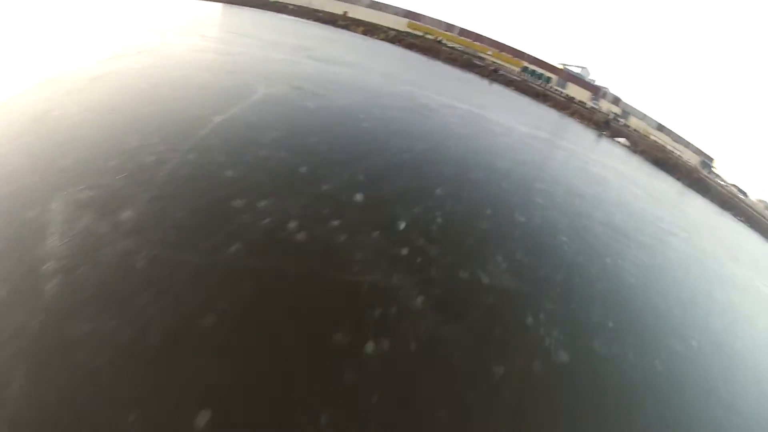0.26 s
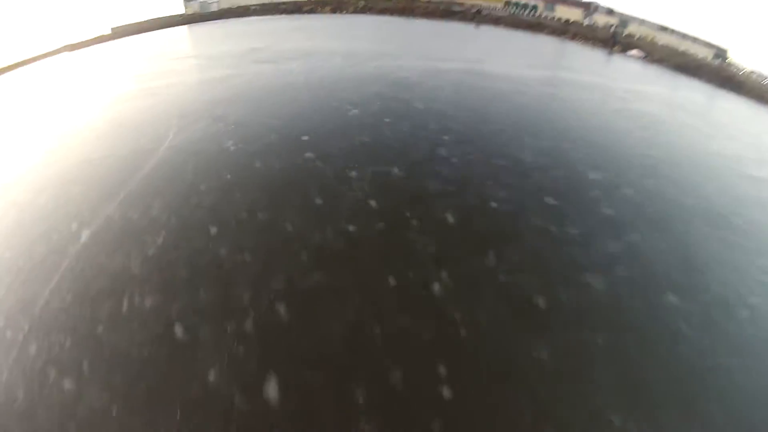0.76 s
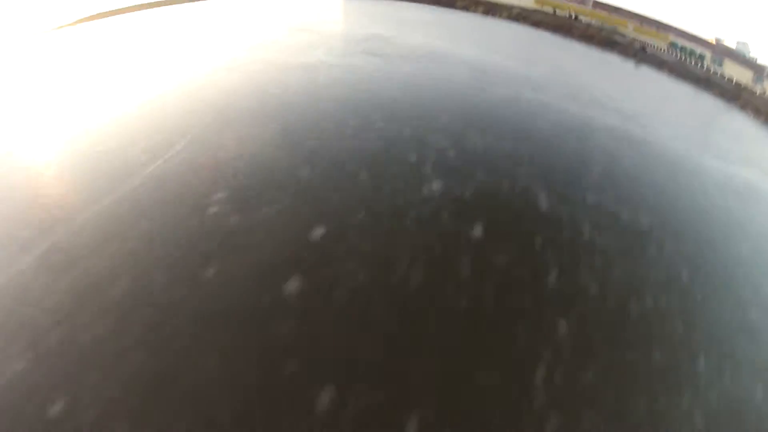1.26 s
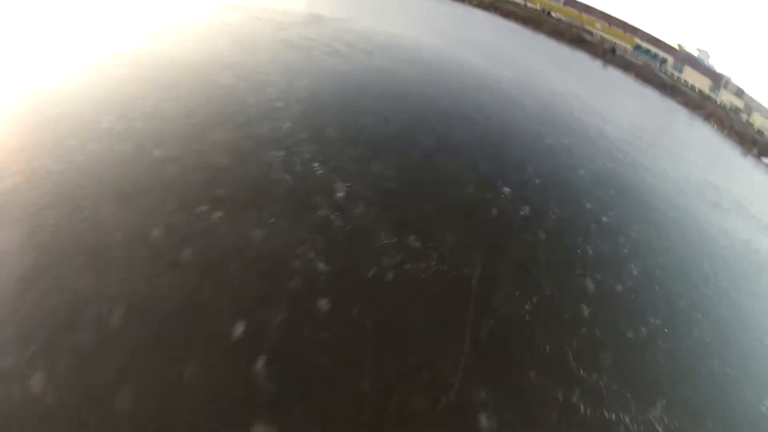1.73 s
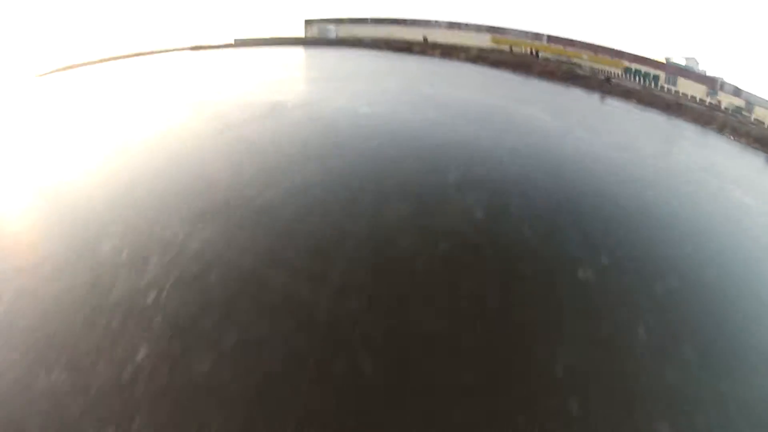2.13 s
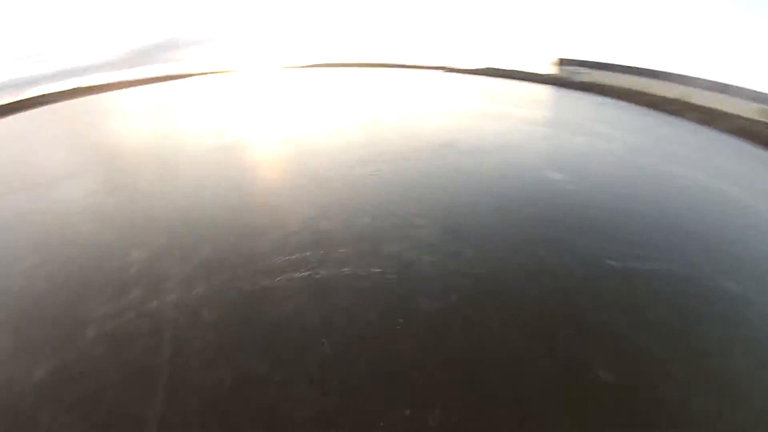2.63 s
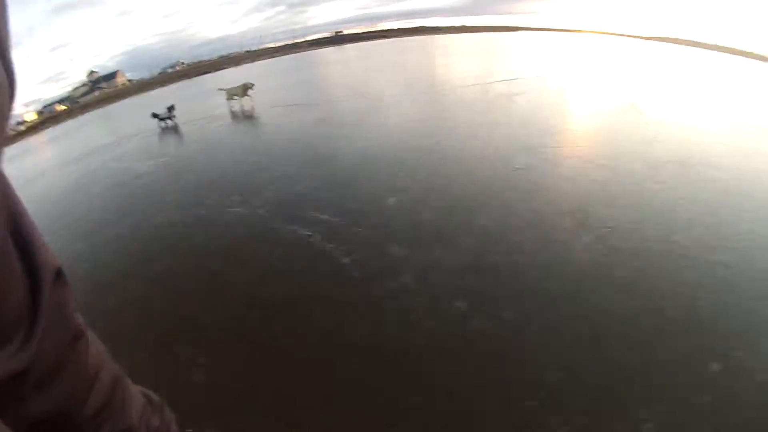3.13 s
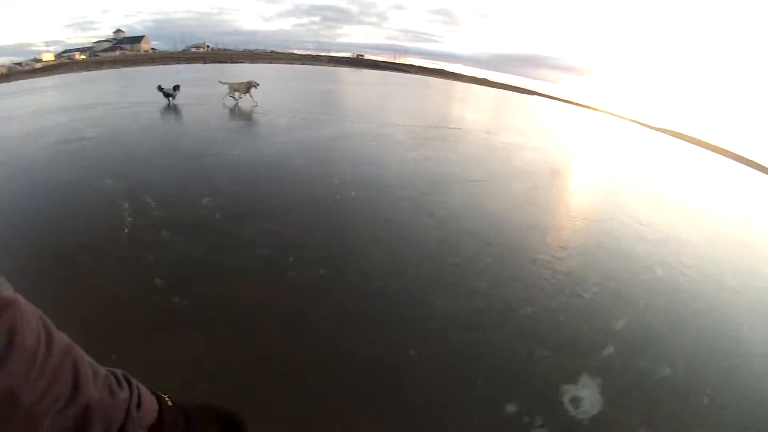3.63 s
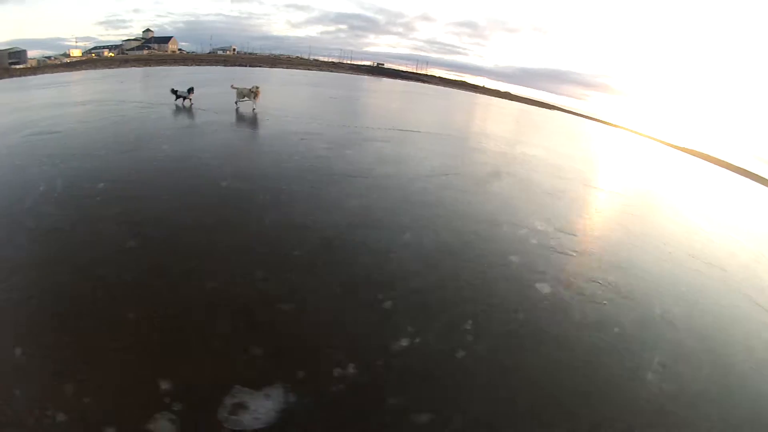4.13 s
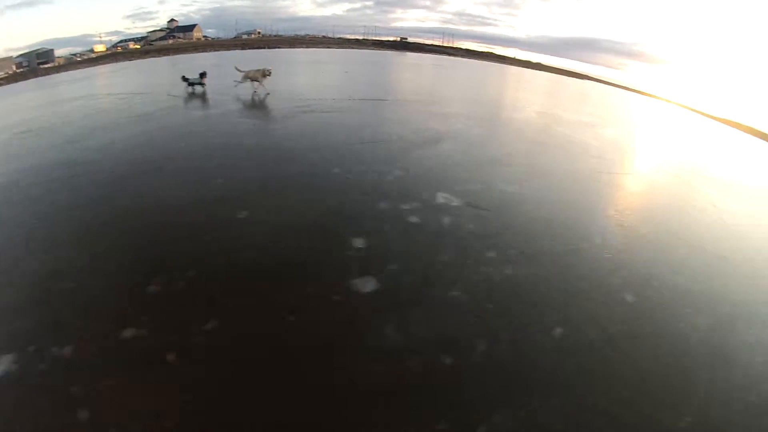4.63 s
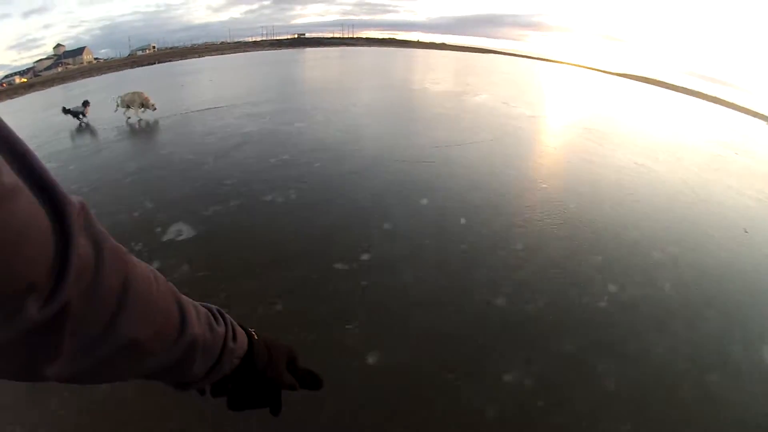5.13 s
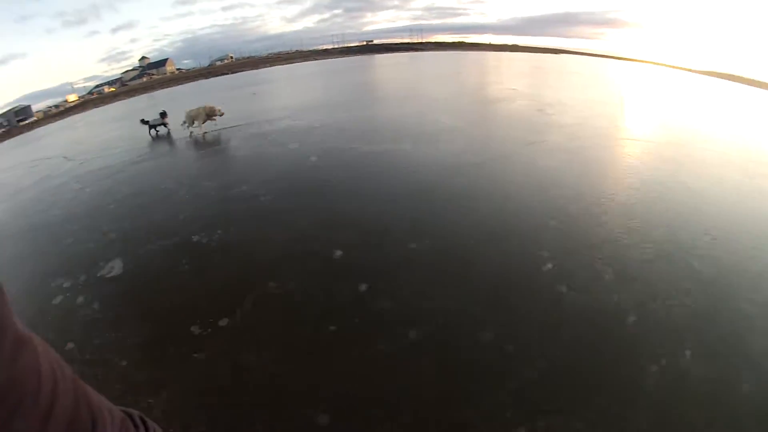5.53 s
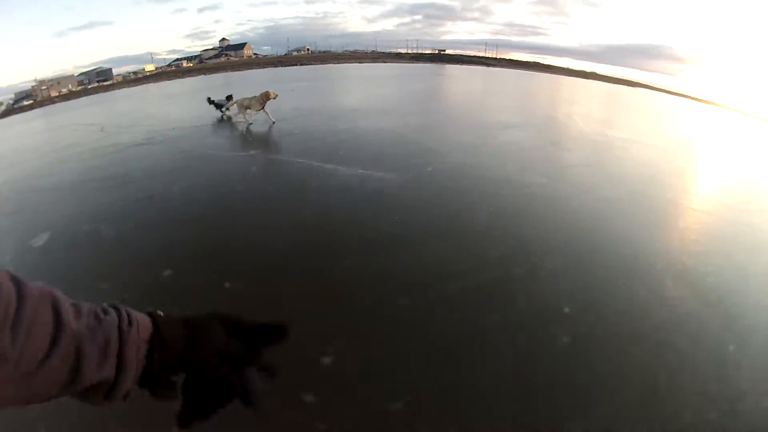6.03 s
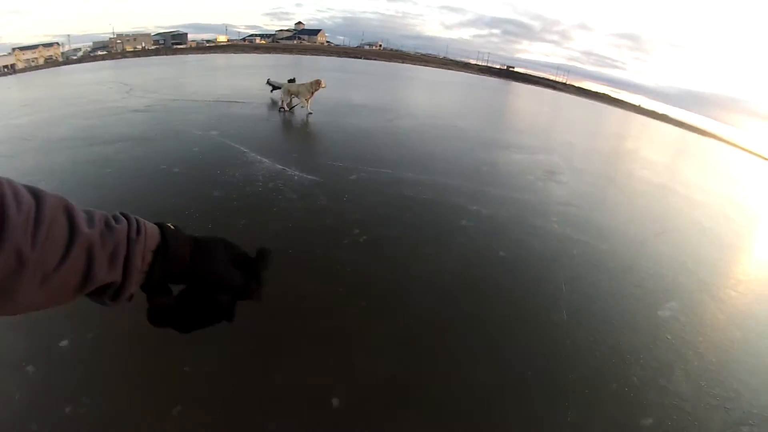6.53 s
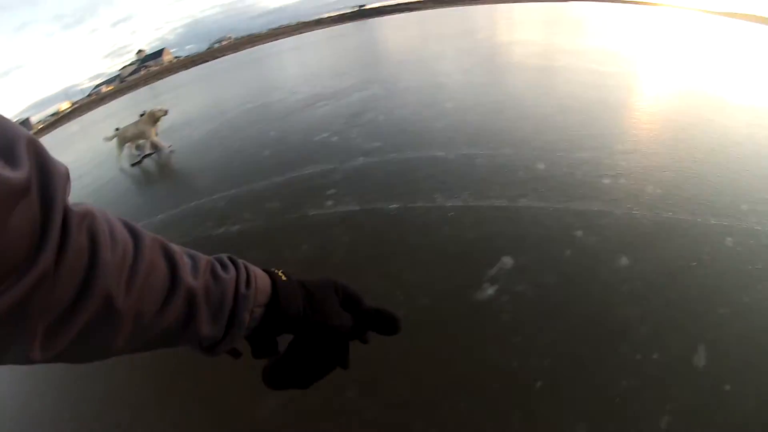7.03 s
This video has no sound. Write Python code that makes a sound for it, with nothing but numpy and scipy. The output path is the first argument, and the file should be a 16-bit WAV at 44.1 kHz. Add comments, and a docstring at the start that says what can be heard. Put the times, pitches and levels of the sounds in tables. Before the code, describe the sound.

Skating on open lake ice, heard from a camera in a sealed plastic housing that gives everything a hollow, nasal ring. From 0 s, short gritty blade hisses swell and fade, with a dull knock at 0.2 s, light ticks over the ice, low wind rumble and faint steady microphone hiss. Strokes are brighter around 1.2-1.3 s, and several ticks cluster near 2 s. At 2.2 s a hand seizes the housing with a heavy thump, then rubs and drags over it; a tiny stuttering rasp comes at 2.5 s, another thump at 2.6 s, then small clicks. The loudest double knock strikes at 3.0 s, and a last bump and bright rub end by 3.35 s. Calmer gliding follows, with scrapes at 3.8, 4.6 and 5.1-5.5 s, ticks around 5.7 s, gusts and a broader scrape near 6.5 s, and clacks and a long scrape around 7 s.

```python
"""On lake ice, a skater glides with a camera in a closed plastic housing, ringing near 1.5 and 2.2 kHz.
The blades hiss in slow strokes (gritty, coloured noise) and tick over flaws in the ice (struck modes).
Air rumbles and flutters past as low noise with gusts, over a steady faint microphone hiss. After an
early knock, the camera is turned round partway through: the hand rubs (noise under pressure), knocks,
rasps (stick-slip) and makes the housing click on its mount."""
import sys
import numpy as np
from scipy import signal
from scipy.fft import rfft, irfft
from scipy.io import wavfile
from scipy.ndimage import uniform_filter1d

SR = 44100
rng = np.random.default_rng(int(sys.argv[2]) if len(sys.argv) > 2 else 0)


def persist_wave(psi):
    """Save psi, clipped to +-1, as 16-bit WAV."""
    counts = np.round(np.clip(psi, -1, 1) * 32767).astype(np.int16)
    wavfile.write(sys.argv[1], SR, np.atleast_2d(counts).T)


N = 321048
TIME = np.arange(N) / SR


def amp(db):
    """Decibels to gain."""
    return 10 ** (np.asarray(db) / 20)


def unit(x):
    """Scales to rms 1."""
    return x / np.sqrt(np.mean(x ** 2) + 1e-20)


def shape(points, hz):
    """Gain of a (f/Hz, level/dB) curve, interpolated over log frequency."""
    f, db = np.transpose(points)
    return amp(np.interp(np.log(hz + 1), np.log(f + 1), db))


def coloured(x, points):
    """Filters x with a spectral curve, then scales it to rms 1."""
    gain = shape(points, np.fft.rfftfreq(len(x), 1 / SR))
    return unit(irfft(rfft(x) * gain, len(x)))


def wander(hz):
    """Random movement of rms 1: noise that rolls off steeply around the given rate."""
    f = np.fft.rfftfreq(N, 1 / SR)
    spectrum = rfft(rng.standard_normal(N)) / (1 + (f / hz) ** 4)
    return unit(irfft(spectrum, N))


def add(mix, s, sound):
    """Mixes a sound in at a time in seconds."""
    part = mix[max(round(s * SR), 0):][:len(sound)]
    part += sound[:len(part)]


def swells(rows, axis, rest_db):
    """Gain over time: each row (t/s, swell/s, fade/s, level/dB, ..) is a bell over a resting level."""
    control_time = TIME[::32]
    power = amp(rest_db) ** 2
    for row in rows:
        peak_s, swell_s, fade_s = row[:3]
        late = control_time - peak_s
        bell = np.exp(-2 * (late / np.where(late < 0, swell_s, fade_s)) ** 2)
        power = power + amp(row[axis]) ** 2 * bell
    return np.interp(TIME, control_time, np.sqrt(power))


def grit(per_s, spread_db, share):
    """Friction: separate micro-fractures of uneven size over a dense wash; share is the grains' power."""
    size = amp(spread_db * np.minimum(rng.exponential(1, N), 4))
    grains = size * rng.choice([-1, 1], N) * (rng.random(N) < per_s / SR)
    share = np.clip(share, 0, 1)
    return np.sqrt(share) * unit(grains) + np.sqrt(1 - share) * rng.standard_normal(N)


# friction makes the cavity sing in a narrow band; drift is a share of its pitch
SING_HZ, SING_WIDTH_HZ, SING_DRIFT = 1445, 110, .04
# the same for the rim, under a biting edge
BITE_HZ, BITE_WIDTH_HZ, BITE_DRIFT = 2266, 200, .05


def sing(hz, width_hz, drift, drift_rate=6):
    """A narrow band of noise at rms 1 whose centre drifts by a share of its pitch."""
    pitch = hz * (1 + drift * wander(hz=drift_rate))
    phase = 2 * np.pi * np.cumsum(pitch) / SR
    in_phase = wander(hz=width_hz / 2) * np.cos(phase)
    quadrature = wander(hz=width_hz / 2) * np.sin(phase)
    return unit(in_phase + quadrature)


def causal(gain):
    """The minimum-phase impulse response: it has this gain and starts at once."""
    log_gain = np.log(np.maximum(gain, 1e-5))
    circle = np.r_[log_gain, log_gain[-2:0:-1]]
    return np.fft.ifft(np.exp(np.conj(signal.hilbert(circle)))).real


def mode(f, hz, width):
    """A steep-sided resonance of peak gain 1: the valleys between modes stay dark."""
    detune = (f * f - hz * hz) / (f * width * np.pi / 2)
    return 1 / (1 + detune ** 2 / 2) ** 2


# the housing's modes, in order frame, walls, lid, air cavity: (f/Hz, width/Hz, relative level/dB)
HOUSING_MODES = [(304, 37, -4), (480, 320, -1), (677, 164, -0.5), (1438, 250, 2)]
# colour of the contact snap: (f/Hz, relative level/dB)
SNAP_SPECTRUM = [(300, -45.5), (1500, -26.5), (2950, 5), (3600, 2.5), (4300, -1), (5400, 0), (6800, -6.5),
                 (7900, -8.5), (9000, -25), (10800, -9.5), (12500, -19), (14000, -24), (16500, -38)]
RIM_WIDTH_HZ, RIM_DB = 455, -2  # the rim's pitch depends on where it is struck
BEND_DELAY_S = .0006  # travel time of a 1 kHz bending wave through the shell; lower ones come later
FADE_OUT_S = 0.043  # fade-out time of each blow's computed response, so the filter does not wrap round


def blow(row, thump_q, soft_hz, snap_s=0.00084, size=4096):
    """One blow: the housing heaves as a whole, its walls, air cavity and rim ring, the contact snaps."""
    ring_db, tilt_db, wall_db, lid_db, cavity_db, rim_hz, thump_db, thump_hz, snap_db = row
    f = np.fft.rfftfreq(size, 1 / SR) + 1
    t = np.arange(size) / SR

    # the heave is a low resonance, softened above and thinned below 35 Hz
    r = f / thump_hz
    thump = amp(thump_db) * r / np.hypot(1 - r * r, r / thump_q)
    thump = thump / (1 + (f / soft_hz) ** 2) * f / np.hypot(f, 35)

    modes = np.array(HOUSING_MODES + [(rim_hz, RIM_WIDTH_HZ, RIM_DB)])
    place_db = np.array([wall_db, wall_db, lid_db, cavity_db, 0])  # the frame shares the wall boost
    strike_db = ring_db + tilt_db * np.log2(modes[:, 0] / 1000) + place_db
    contact = 1 / np.hypot(1, (f / 3800) ** 3)  # the contact lasts too long to drive the modes far up
    rings = [amp(db + drive_db) * mode(f, hz, width) * contact
             for (hz, width, db), drive_db in zip(modes, strike_db)]

    # the ring travels through the shell and is faded out before its buffer ends
    impulse = causal(np.linalg.norm([thump] + rings, axis=0))
    bending = np.exp(-4j * np.pi * BEND_DELAY_S * np.sqrt(1000 * f))
    fade_out = np.exp(-(t / FADE_OUT_S) ** 4)
    body = irfft(rfft(impulse) * bending) * fade_out

    crunch = rng.standard_normal(size) * t * np.exp(-t / snap_s)  # the surfaces graze for an instant
    crunch = crunch / np.linalg.norm(crunch)
    snap = signal.fftconvolve(crunch, causal(shape(SNAP_SPECTRUM, f)))[:size]
    return body + amp(snap_db) * snap


def blows(rows, thump_q, soft_hz, tail_db, tail_s, size=4096):
    """A table of blows, each with a brief noisy rattle that starts with the hit, thinned below 300 Hz."""
    out = np.zeros(N)
    t = np.arange(size) / SR
    above_thump = signal.butter(2, 300, "high", fs=SR)
    for s, *row in rows:
        hit = blow(row, thump_q, soft_hz)
        rattle = rng.standard_normal(size) * np.exp(-t / tail_s)
        rattle = signal.lfilter(*above_thump, rattle / np.linalg.norm(rattle))
        start = s - BEND_DELAY_S
        add(out, start, hit)
        add(out, start, amp(tail_db) * signal.fftconvolve(hit, rattle))
    return out


# colours of the dull scrape, bright edge and fine ice spray: (f/Hz, relative level/dB)
SCRAPE_SPECTRUM = [(250, -17), (450, -12), (580, -16), (700, -4.5), (830, -5.5), (960, -14), (1170, -7.5),
                   (1330, -1), (1500, 2), (1620, -5.5), (1760, -22), (2100, -47.5)]
EDGE_SPECTRUM = [(600, -15.5), (1200, -15), (1750, -7.5), (1950, -1.5), (2130, 4), (2400, -2), (2650, -5),
                 (3000, -9.5), (3400, -26), (3800, -11.5), (4500, -46)]
SPRAY_SPECTRUM = [(2500, -25), (3300, -9.5), (3850, 3), (4400, 1), (5100, 5), (6000, -2.5), (7000, 0.5),
                  (7800, -2.5), (8800, -14.5), (10200, -17), (11300, -3), (12500, -14), (13200, -46)]
# a crumb of ice under a blade, one blow before levelling: (ring level/dB, tilt/dB per octave,
# wall boost/dB, lid boost/dB, cavity boost/dB, rim f/Hz, thump level/dB, thump f/Hz, snap level/dB)
ICE_CRUMB = (-1.5, 0.5, -0.5, 2.5, -2.5, 2195.5, -16.5, 128.5, -18)
# strokes of the blades, t at full weight, relative levels:
# (t/s, swell/s, fade/s, scrape level/dB, edge level/dB, spray level/dB)
BLADE_STROKES = [(0.0, 0.037, 0.084, -69, -68, -78.5), (0.24, 0.038, 0.12, -77, -72.5, -81.5),
                 (0.6, .05, 0.033, -69.5, -72, -83.5), (0.76, 0.16, 0.1, -80, -74.5, -83),
                 (1.19, 0.079, 0.095, -73.5, -69, -78), (1.31, 0.056, 0.087, -69, -67.5, -78.5),
                 (1.82, .2, 0.28, -73.5, -83, -87), (2.18, 0.11, 0.087, -75.5, -73, -82),
                 (3.42, 0.065, 0.22, -76, -80, -90.5), (3.8, 0.028, 0.02, -64, -72, -100),
                 (4.0, 0.35, .22, -77.5, -80.5, -89), (4.59, 0.084, 0.072, -66.5, -65.5, -84.5),
                 (4.86, 0.11, .06, -84.5, -77, -86.5), (5.14, 0.093, 0.11, -64.5, -75.5, -84),
                 (5.33, 0.04, 0.046, -65.5, -78, -82), (5.5, 0.16, 0.27, -72, -78, -84),
                 (6.55, .11, 0.14, -67.5, -69, -86.5), (7.14, 0.17, 0.21, -68.5, -78, -81)]
COAST_DB, COAST_EDGE_DB, COAST_SPRAY_DB = -79.5, -82, -91  # the blades running free between strokes


def blades():
    """Steel shaves the ice: gritty friction that chatters over the uneven surface, sings, crushes crumbs."""
    chatter = wander(hz=46)
    friction = grit(per_s=420, spread_db=4.0, share=0.16)
    weight = swells(BLADE_STROKES, axis=3, rest_db=COAST_DB)
    edge_weight = swells(BLADE_STROKES, axis=4, rest_db=COAST_EDGE_DB)
    spray_weight = swells(BLADE_STROKES, axis=5, rest_db=COAST_SPRAY_DB)

    scrape = amp(-2.95) * coloured(friction, SCRAPE_SPECTRUM)
    scrape = scrape + amp(-9.5) * sing(SING_HZ, SING_WIDTH_HZ, SING_DRIFT)
    scrape = scrape * amp(2.1 * chatter) * weight

    edge = amp(-0.37) * coloured(friction, EDGE_SPECTRUM)
    edge = edge + amp(-8.5) * sing(BITE_HZ, BITE_WIDTH_HZ, BITE_DRIFT)
    edge = edge * amp(2.0 * chatter) * edge_weight

    spray = coloured(grit(per_s=1500, spread_db=7.5, share=0.17), SPRAY_SPECTRUM)
    spray = unit(spray * amp(0.83 * chatter)) * spray_weight

    crumb_hits = grit(per_s=90, spread_db=4.0, share=1)
    crumbs = signal.oaconvolve(crumb_hits, blow(ICE_CRUMB, thump_q=1.7, soft_hz=357))[:N]
    return scrape + edge + spray + amp(-5.5) * unit(crumbs) * weight


# air moving by the housing, calmer once the camera faces sideways, relative levels:
# (t/s, rumble level/dB, flutter level/dB)
SLOW_BREEZE = [(0.0, -61.5, -65), (0.5, -65, -67.5), (1.802, -67, -74), (2.15, -63.5, -69),
               (3.302, -68, -79.5), (3.6, -63.5, -79.5), (4.352, -70, -85.5), (4.8, -63, -70),
               (5.05, -69, -80.5), (5.75, -66.5, -69.5), (5.95, -64.5, -82), (6.301, -67, -82),
               (7.269, -66.5, -73.5)]
# gusts as the body swings, relative levels: (t/s, half length/s, rumble level/dB, flutter level/dB)
BODY_GUSTS = [(0.0, 0.022, -55, -65), (0.97, 0.064, -59.5, -82), (1.327, 0.15, -59, -60.5),
              (1.59, 0.05, -57.5, -64.5), (3.85, 0.086, -66.5, -79), (4.164, 0.025, -56, -87),
                       (4.524, .05, -60.5, -72), (5.161, 0.032, -56, -82), (5.45, 0.084, -65, -81),
              (6.44, 0.044, -60.5, -77), (6.621, 0.034, -54, -63.5), (6.76, 0.043, -59, -72),
              (7.116, .06, -58, -69)]


def airflow(axis):
    """Gain over time of the slow breeze with its gusts on top; axis 1 is rumble, 2 is flutter."""
    breeze = np.transpose(SLOW_BREEZE)
    bells = [(s, half, half, *db) for s, half, *db in BODY_GUSTS]
    gusts = swells(bells, axis=axis + 2, rest_db=-np.inf)
    return np.hypot(amp(np.interp(TIME, breeze[0], breeze[axis])), gusts)


# colours of the low buffeting, lighter flutter and microphone hiss: (f/Hz, relative level/dB)
RUMBLE_SPECTRUM = [(10, 4.5), (25, 0), (40, -0.5), (60, -7), (100, -14.5), (135, -26), (200, -32.5),
                   (400, -66)]
FLUTTER_SPECTRUM = [(80, -16.5), (140, 8), (200, -3.5), (270, -10), (400, -18), (700, -50.5)]
HISS_SPECTRUM = [(100, 3), (400, 15.5), (1000, 8.5), (3000, 2), (8000, -2), (12400, -2.5), (13200, -37.5)]


def air():
    """Moving air as coloured noise: lumpy low buffeting and a lighter flutter;
    beneath it the microphone's steady faint hiss."""
    rumble = coloured(rng.standard_normal(N), RUMBLE_SPECTRUM)
    rumble = unit(rumble * amp(2 * wander(hz=13)))
    lumps = amp(2.5 * wander(hz=25))
    flutter = unit(coloured(rng.standard_normal(N), FLUTTER_SPECTRUM) * lumps)
    hiss = coloured(rng.standard_normal(N), HISS_SPECTRUM)
    moving = amp(4.0) * rumble * airflow(axis=1) + amp(-2.0) * flutter * airflow(axis=2)
    return moving + amp(-82) * hiss


# knocks and soft bumps of the hand; the boosts depend on where it lands, levels are relative:
# (t/s, ring level/dB, tilt/dB per octave, wall boost/dB, lid boost/dB, cavity boost/dB,
# rim f/Hz, thump level/dB, thump f/Hz, snap level/dB)
HAND_KNOCKS = [(0.2018, -9, 0, -4, 11.5, -13, 2200, 7.5, 130, -36),
               (2.2207, -0.5, 10, 9.5, 0, 2.5, 1810, 24, 61.4, -14),
               (2.2634, -3, 3, 0, 1, 3.5, 2390, 17, 112, -22.5),
               (2.3133, -24.5, -5, -3, 0, 12, 1976, -5, 123, -50),
               (2.5573, -22, -2, -9, 6, -6, 2150, 1, 200, -38.5),
               (2.5847, -1, -2, 2.5, 2.5, -2, 1810, 24, 64, -37),
               (2.6023, -20, -1, 0, 5, -5, 2070, 5, 55, -33),
               (2.8919, -32, 4, 0, 2, 9, 2100, 16, 63.8, -60),
               (2.9791, -7.5, -5.5, -4, 4.5, -6, 1852, -12, 78.4, -41),
               (2.9874, 9.5, 0, 2.5, 1.5, 6, 2100, 28.5, 130, -10.5),
               (3.0090, 11.5, 8, 6.5, 0, -16.5, 1770, 22, 120, -25),
               (3.2661, -1, -0.5, -22, 1.5, 1.5, 1800, 19.5, 105, -40),
               (3.3085, -24, 9, 2, 2, -4, 1899, 7, 125, -58)]


def knocks():
    """The hand strikes the housing, so its body thumps, its modes ring and its shell rattles."""
    return blows(HAND_KNOCKS, thump_q=1.5, soft_hz=315, tail_db=-10.0, tail_s=0.0056)


# blades clacking over flaws in the ice, heard through the housing, relative levels:
# (t/s, ring level/dB, tilt/dB per octave, cavity boost/dB, thud level/dB)
BLADE_TICKS = [(0.4339, -24, -3, -8, -45), (0.651, -21, -5, -8, 0), (0.8507, -18, 2.5, -9, -9),
               (1.0085, -22.5, 4.5, 1, -42), (1.1413, -32, -1, 5.5, -38), (1.3425, -38, 5, 3, 3.5),
               (1.5945, -34, 5, 0, -18), (1.834, -25, 0, 0, -21), (1.918, -21, -6.5, 6, -28),
               (1.9803, -16, -4.5, -1, -23), (2.015, -23.5, -1.5, -3, -10), (2.06, -24, 4.5, -4, -2),
               (3.7743, -31, 8, -10, -28), (3.841, -36, 7, 2, -18), (3.9007, -26, -0.5, -1, -36),
               (4.7032, -33, 1, -9, -6.5), (4.901, -34, -5, -6, -10), (4.9345, -36, -5.5, -1, -12),
               (5.3227, -18.5, -3.5, 0, -28), (5.4449, -28.5, 7.5, 3, -30), (5.5254, -35, -8, 0, -21),
               (5.714, -18, 0, 1, -7), (5.74, -24, 1.5, 1, -27), (5.804, -22, -3, -12, -4),
               (5.9615, -33.5, 9.5, 2, -37), (6.0547, -27.5, 2, 4.5, -43), (6.1599, -27.5, -3.5, -2, -10.5),
               (6.932, -19.5, 1.5, -0.5, -32), (6.9707, -23.5, -3, 0, -25), (6.9904, -27, -1, 3, -11),
               (7.0625, -14, 4.5, 0, -14), (7.1714, -30, 3, 13, -30)]
TICK_RIM_HZ, TICK_THUD_HZ = 2150, 98
TICK_SNAP_DB = -21  # relative to ring plus tilt


def ticks():
    """The blades clack and thud; the harder and brighter the clack, the more it snaps."""
    rows = []
    for s, db, tilt_db, cavity_db, thud_db in BLADE_TICKS:
        snap_db = db + tilt_db + TICK_SNAP_DB
        rows.append((s, db, tilt_db, 0, 0, cavity_db, TICK_RIM_HZ, thud_db, TICK_THUD_HZ, snap_db))
    return amp(-3.5) * blows(rows, thump_q=2.1, soft_hz=305, tail_db=-2.5, tail_s=0.0031)


# colours of the dull rub, bright rub, fizz and low push: (f/Hz, relative level/dB)
RUB_BODY_SPECTRUM = [(200, 0), (450, -17), (700, -12), (1000, -8.5), (1200, -8), (1400, 6), (1600, -3.5),
                     (1850, -16), (2400, -52.5)]
RUB_EDGE_SPECTRUM = [(1200, -12.5), (1700, 0), (2100, 6), (2500, 0), (3000, -18), (4500, -45)]
RUB_FIZZ_SPECTRUM = [(2000, -21), (3400, 1.5), (4300, 1.5), (5300, 2), (6500, -5), (7600, -6.5), (9500, -4),
                     (11000, -10), (12500, -11.5), (14500, -16.5), (16000, -22)]
RUB_PUSH_SPECTRUM = [(8, 10), (18, -2), (30, 11), (60, -9), (120, -8), (200, -25), (400, -65.5)]
# drags of the hand over the housing, t at full pressure, relative levels: (t/s, swell/s, fade/s,
# dull rub level/dB, bright rub level/dB, fizz level/dB, low push level/dB)
HAND_DRAGS = [(2.228, 0.0081, 0.092, -56, -54, -59, -40), (2.455, 0.08, 0.07, -53.5, -57, -65, -45.5),
              (2.595, 0.023, 0.043, -58, -57, -74, -37.5), (2.73, 0.082, 0.081, -56.5, -56.5, -69, -62),
              (2.91, 0.019, 0.096, -60, -60.5, -69, -43.5), (3.18, 0.038, 0.093, -56, -65.5, -69.5, -39),
              (3.277, 0.036, .02, -52, -46.5, -54.5, -43)]
GRIP_START_S, GRIP_END_S = 2.215, 3.35  # the hand rubs the housing from, to
# the resting grip between drags
HOLD_DB, HOLD_EDGE_DB, HOLD_FIZZ_DB, HOLD_PUSH_DB = -73, -74, -88.5, -46.5


def hand():
    """The hand drags over the plastic as uneven friction, fizzing, and presses the walls in and out."""
    unevenness = amp(1.5 * wander(hz=90))
    friction = grit(per_s=1500, spread_db=0.5, share=0.36) * unevenness
    rub = coloured(friction, RUB_BODY_SPECTRUM) + amp(-9.5) * sing(SING_HZ, SING_WIDTH_HZ, SING_DRIFT)
    rub = rub * swells(HAND_DRAGS, axis=3, rest_db=HOLD_DB)
    edge = amp(-2.0) * coloured(friction, RUB_EDGE_SPECTRUM)
    edge = edge * swells(HAND_DRAGS, axis=4, rest_db=HOLD_EDGE_DB)
    fizz = amp(-2.5) * coloured(friction, RUB_FIZZ_SPECTRUM)
    fizz = fizz * swells(HAND_DRAGS, axis=5, rest_db=HOLD_FIZZ_DB)
    push = amp(-0.5) * coloured(rng.standard_normal(N), RUB_PUSH_SPECTRUM)
    push = push * swells(HAND_DRAGS, axis=6, rest_db=HOLD_PUSH_DB)
    gripped = 1. * (TIME > GRIP_START_S) * (TIME < GRIP_END_S)
    touching = uniform_filter1d(gripped, size=400)  # soft edges
    return (rub + edge + fizz + push) * touching


# what the rasp rings with: (f/Hz, width/Hz, relative level/dB)
RASP_MODES = [(680, 140, 4), (1980, 370, 1.5), (2670, 520, -3.5), (3770, 490, 2), (5700, 580, -3.5),
              (7600, 500, -19), (9400, 430, -15), (10700, 600, -12), (11600, 500, -19), (13550, 610, -5.5),
              (15000, 700, -21)]
# slow slips build until the grip lets go, then quicker ones die away; levels are relative
LET_GO_S, LET_GO_DB, SLIP_DECAY_S = 2.5114, -28, 0.0011
BUILD_GAP_S, BUILD_DB_PER_SLIP = 0.005, 9
RUN_GAP_S, RUN_DB_PER_SLIP = 0.00374, -4


def rasp(count=4):
    """The grip sticks and slips in a quickening run of scratches (noise bursts) that ring the shell."""
    slips = [(LET_GO_S - k * BUILD_GAP_S, LET_GO_DB - k * BUILD_DB_PER_SLIP) for k in range(count)]
    slips += [(LET_GO_S + k * RUN_GAP_S, LET_GO_DB + k * RUN_DB_PER_SLIP) for k in range(1, count + 1)]
    strength = np.zeros(N)
    for s, db in slips:
        decay = np.exp(-np.maximum(TIME - s, 0) / SLIP_DECAY_S)
        strength += amp(db) * decay * (TIME >= s)
    f = np.fft.rfftfreq(4096, 1 / SR) + 1
    rings = [amp(db) * mode(f, hz, width) for hz, width, db in RASP_MODES]
    shell = causal(np.linalg.norm(rings, axis=0))
    scratches = strength * rng.standard_normal(N)
    return amp(-2.0) * signal.oaconvolve(scratches, shell / np.linalg.norm(shell))[:N]


# small alike clicks of the housing shifting on its mount, relative levels:
# (t/s, ring level/dB, snap level/dB)
MOUNT_CLICKS = [(2.652, -3.5, -33.5), (2.688, -1.5, -24.5), (2.7859, -2.5, -26.5), (2.8529, -4, -50),
                (2.8747, -5.5, -41), (2.9363, -3, -39), (3.0037, -2.5, -36.5), (3.0535, -4, -31.5),
                (3.1604, -2, -27.5)]
CLICK_TILT_DB, CLICK_RIM_HZ = -2, 2360  # tilt in dB per octave
CLICK_THUMP_DB, CLICK_THUMP_HZ = 0.5, 129  # thump level relative to the ring


def clicks():
    """The mount clicks with one colour of ring; its small thump follows the strength."""
    rows = []
    for s, db, snap_db in MOUNT_CLICKS:
        thump_db = db + CLICK_THUMP_DB
        rows.append((s, db, CLICK_TILT_DB, 0, 0, 0, CLICK_RIM_HZ, thump_db, CLICK_THUMP_HZ, snap_db))
    return blows(rows, thump_q=1.62, soft_hz=340, tail_db=-8.5, tail_s=0.002)


def scene():
    """Skating, with the handling of the camera on top."""
    skating = blades() + air() + ticks()
    handling = knocks() + hand() + rasp() + clicks()
    return (skating + handling)[None]


def record(dry):
    """The recorder's band limit: a steep low-pass at 15.6 kHz."""
    low_pass = signal.firwin(255, 15600, window=("kaiser", 9), fs=SR)
    return signal.oaconvolve(dry, low_pass[None], "same")


dry = scene()
out = record(dry)
persist_wave(out)
```